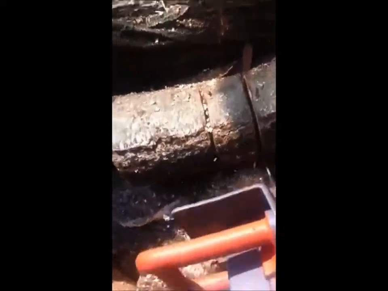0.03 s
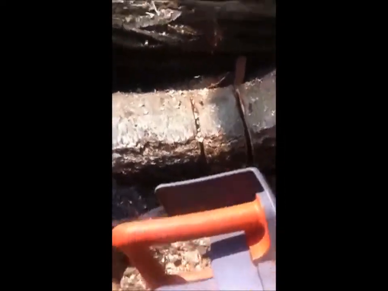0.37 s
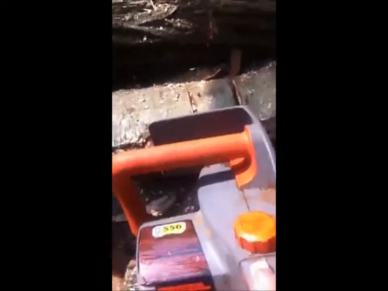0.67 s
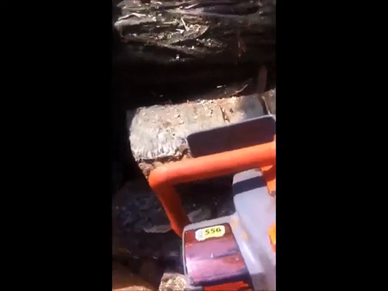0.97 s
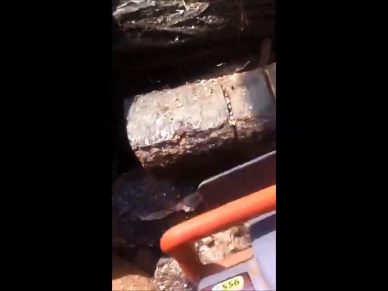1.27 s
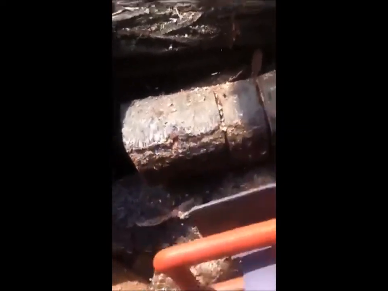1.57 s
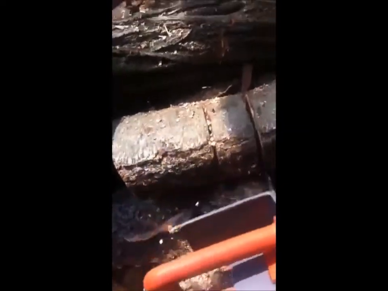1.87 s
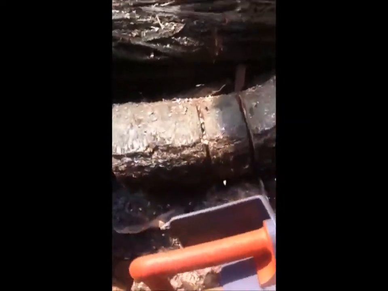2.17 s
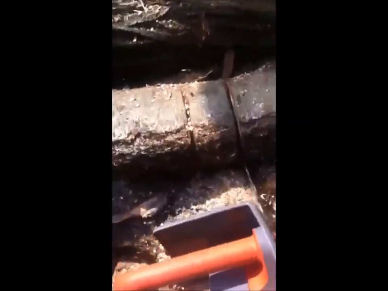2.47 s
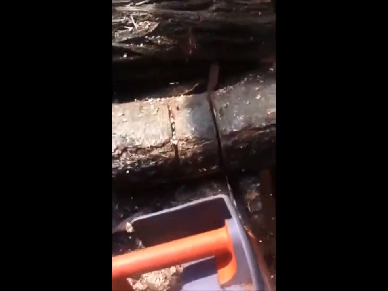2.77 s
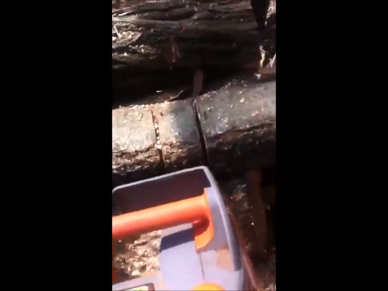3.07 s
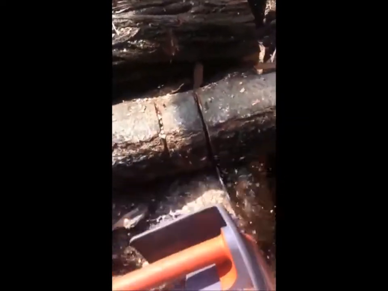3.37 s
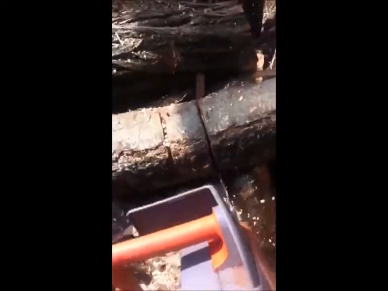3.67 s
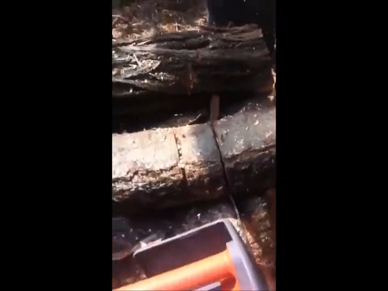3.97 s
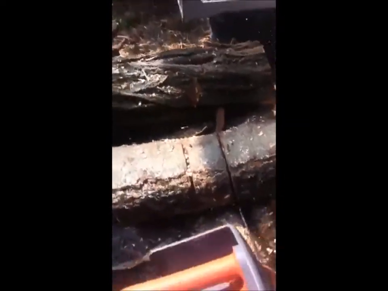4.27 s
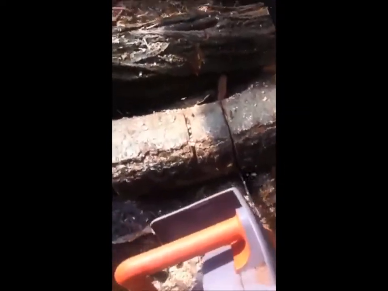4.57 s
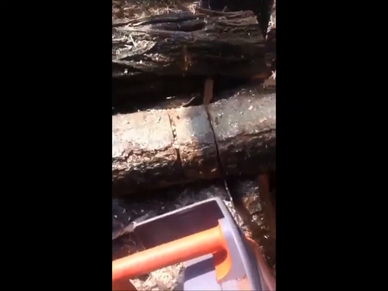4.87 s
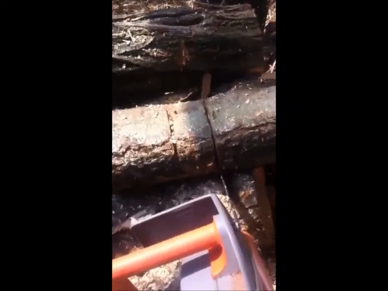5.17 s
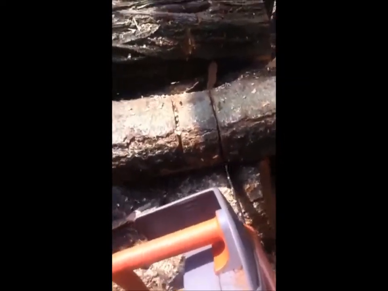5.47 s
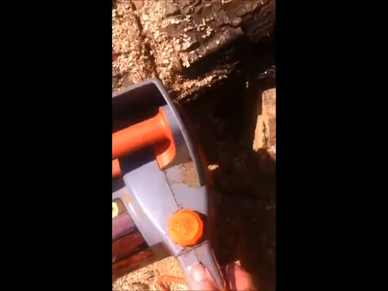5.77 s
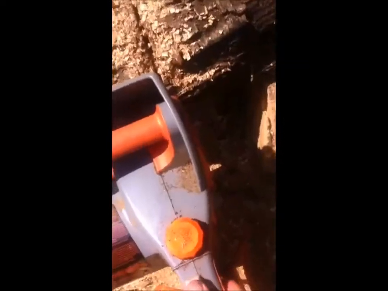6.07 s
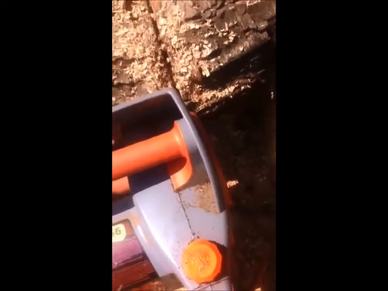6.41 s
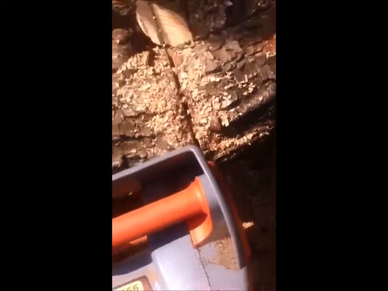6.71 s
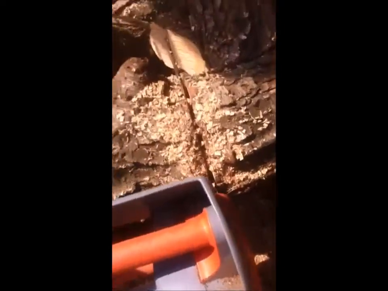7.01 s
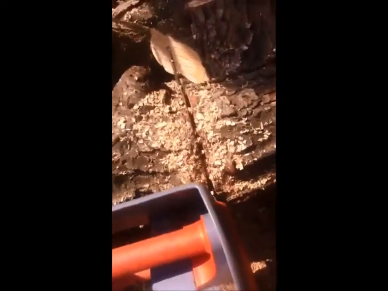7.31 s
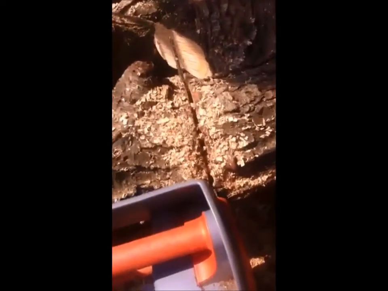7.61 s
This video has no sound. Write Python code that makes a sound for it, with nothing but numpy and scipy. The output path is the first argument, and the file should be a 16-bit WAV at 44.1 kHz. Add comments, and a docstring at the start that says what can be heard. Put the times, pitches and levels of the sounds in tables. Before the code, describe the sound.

Close by and outdoors, an electric chainsaw buzzes and rasps steadily through a log, its pitch sagging slightly under load, with brief thin shrieks from the bar. The cutting ends and the saw coasts down in a falling, rattling whine. In the quiet afterwards come light handling clicks, soft scraping on bark and barely audible bird whistles, before the saw clacks and begins spinning up again.

```python
"""Electric chainsaw cutting a log

Outdoors, the motor hums through rotor unbalance, chain links rattle the housing and teeth rasp the wood.
The trigger is let go, and friction and drag bring the whining gears to a stop. The level dips briefly;
the saw clicks and scrapes as it is shifted on the log, a far bird whistles, and the motor starts
again with a clack."""
import sys
import numpy as np
from scipy import signal
from scipy.fft import rfft, irfft
from scipy.io import wavfile

SR = 44100
rng = np.random.default_rng(int(sys.argv[2]) if len(sys.argv) > 2 else 0)


def generate_wav(sig):
    """Save sig (samples, or channels by samples) to the path in sys.argv[1] as 16-bit PCM at SR."""
    pcm = np.round(np.clip(np.atleast_2d(sig).T, -1, 1) * 32767).astype(np.int16)
    wavfile.write(sys.argv[1], SR, pcm)


N = 346185
T = np.arange(N) / SR
FULL_HZ, LINKS_PER_TURN, GEAR_ORDER = 390, 1.073, 11.8  # motor speed; links and gear teeth per turn


def amp(db):
    """Decibels to gain."""
    return 10 ** (np.asarray(db) / 20)


def unit(x):
    """Scale to rms 1."""
    return x / np.sqrt(np.mean(x ** 2))


def noise():
    """White noise."""
    return rng.standard_normal(N)


def walk(rate):
    """Random fluctuation of rms 1 that changes rate times a second."""
    return unit(np.interp(T * rate, np.arange(N), noise()))


def cycles(hz):
    """Phase in cycles, the integral of frequency."""
    return np.cumsum(hz) / SR


def swells(x, rows):
    return sum(height * np.exp(-((x - centre) / width) ** 2) for centre, width, height in rows)


def episodes(rows, x=T):
    """Gaussian swells of gain along x, with heights given in dB."""
    return swells(x, [(centre, width, amp(db)) for centre, width, db in rows])


def butter(x, order, hz, kind="low"):
    """Maximally flat filter."""
    return signal.sosfilt(signal.butter(order, hz, kind, fs=SR, output="sos"), x)


def colour(x, points):
    """Minimum-phase filter with the given (Hz, dB) shape and unit power gain."""
    hz, db = np.transpose(points)
    log_gain = np.interp(np.log(np.arange(2049) * SR / 4096 + 1), np.log(hz), np.log(amp(db)))
    cepstrum = irfft(log_gain) * np.r_[1, np.full(2047, 2), 1, np.zeros(2047)]
    response = irfft(np.exp(rfft(cepstrum)))
    return signal.fftconvolve(x, response / np.linalg.norm(response))[:N]


def ring(x, modes):
    """Forced response of parallel resonators."""
    return sum(amp(db) * signal.lfilter(*signal.iirpeak(hz, hz / width, fs=SR), x)
               for hz, width, db in modes)


def shifting(x, modes, depth_db, rate):
    """Modal excitation varies as the point of impact moves."""
    return sum(amp(depth_db * np.tanh(walk(rate))) * ring(x, [mode]) for mode in modes)


def blows(count, scatter_db, decay_cycles):
    """Impact train: one decaying noise burst per cycle."""
    strength = amp(scatter_db * noise()[count.astype(int)])
    return unit(strength * np.exp(-(count % 1) / decay_cycles) * noise())


# Hum under load. Each row: time in seconds, relative level in dB.
HUM_LEVELS = [(0.0, -17), (0.05, -23), (0.24, -14.5), (0.26, -26.5), (0.32, -18), (0.97, -27.5),
              (1.01, -38), (1.04, -25.5), (1.15, -24.5), (1.18, -18), (1.22, -36), (1.3, -16.5),
              (1.36, -22.5), (1.9, -19.5), (2.23, -22.5), (2.25, -17.5), (2.55, -20), (2.56, -22),
              (2.96, -16), (3.03, -25), (3.14, -21.5), (3.16, -28), (3.41, -16), (3.45, -29), (3.5, -19),
              (3.83, -26.5), (4.14, -23.5), (4.3, -23.5)]
# Partials of buzz and growl. Each row: multiple of the motor speed, relative level in dB.
BUZZ_PARTIALS = [(2, 1.5), (2.146, -9.5), (3, -4)]
GROWL_PARTIALS = [(.5, -12), (1.5, -4)]
# Peaks of the buzz. Each row: motor speed in Hz, half width in Hz, boost in dB.
BUZZ_SPEEDS = [(372, 14, 4.2), (282, 29, 10)]
# The motor labours; the bar chatters. Each row: centre and half length in seconds, relative level in dB.
LABOURING = [(0.038, 0.051, 8.5), (0.251, 0.11, 6), (2.39, .08, 7), (2.84, 0.1, 5), (3.663, 0.21, 6.5),
             (4.259, .06, 2)]
GROWLS = [(.35, 0.36, -31), (.93, 0.24, -26), (1.31, 0.033, -20), (2.98, 0.23, -23.5), (3.87, 0.11, -37)]


def motor(hz, halvings):
    """Rotor unbalance hums, with buzzing overtones; bar chatter adds a half-speed subharmonic growl."""
    phase = 2 * np.pi * cycles(hz * (1 + 0.0049 * walk(70)))
    hum_db = np.interp(T, *np.transpose(HUM_LEVELS)) + 1.45 - 18 * np.maximum(halvings - .1, 0)
    buzz_db = -32.5 - 9.5 * halvings + swells(hz, BUZZ_SPEEDS) + swells(T, LABOURING)
    out = amp(hum_db + 2 * walk(40)) * np.sin(phase)
    for gain, partials in ((amp(buzz_db), BUZZ_PARTIALS), (episodes(GROWLS), GROWL_PARTIALS)):
        out += gain * sum(amp(db + 5 + 1.7 * walk(30)) * np.sin(k * phase) for k, db in partials)
    return out


# Spectra of the chain. Each row: frequency in Hz, relative level in dB.
RATTLE_SPECTRUM = [(40, -41.5), (90, -48.5), (140, -25), (200, -9.5), (300, -2), (450, -0.5), (620, 4),
                   (900, 0.5), (1400, -1.5), (2000, -3), (2800, -9), (4000, -11.5), (7000, -22.5),
                   (15000, -50.5)]
RASP_SPECTRUM = [(300, -52), (1500, -8), (3000, -0.5), (3900, -1), (4400, -2), (5200, 0.5), (6200, -3),
                 (7200, -8), (9400, -9.5), (11000, -15.5), (13000, -15.5), (15700, -23.5)]
# Resonances that it excites. Each row: frequency in Hz, bandwidth in Hz, gain in dB.
HOUSING_MODES = [(311.3, 25, -4), (530, 26, -21), (892, 29, -11), (1109, 34, 3), (1168, 23, 2),
                 (1450, 100, -14), (1895, 14, -1)]
BAR_MODES = [(2515, 38, -1.5), (3570, 100, -1), (4270, 54, -2), (4770, 70, -8.5), (5880, 120, -6)]
SLACK_MODES = [(302, 57, -4.5), (537, 67, 12), (1102, 500, 0.5), (1560, 99, 3.5), (1887, 60, 0.5),
               (2280, 70, 2.5), (3440, 50, 9), (4730, 90, -15.5), (7600, 360, -6.5)]


def chain(hz, load, throb, rattle_db, rasp_db):
    """Impact excitation: links strike the sprocket, and a tooth on every second link tears the wood."""
    links = cycles(LINKS_PER_TURN * hz * (1 + .04 * walk(300)))
    knocks = unit(blows(links, scatter_db=0.5, decay_cycles=0.51) + 1.53 * noise())
    knocks *= throb * amp(0.61 * walk(90))
    # the chain jumps in its groove roughly 65 times a second
    jumps = blows(cycles(65 * amp(4 * walk(80))), scatter_db=1.5, decay_cycles=0.29)
    strikes = knocks + amp(-6.5) * load * jumps
    housing = shifting(strikes, HOUSING_MODES, depth_db=1.5, rate=18)
    body = unit(colour(strikes + 1.1 * housing, RATTLE_SPECTRUM))
    # a broad crunch grows as the load pulls the motor below full speed
    body += 4 * load * (1 - hz / FULL_HZ) * ring(body, [(2000, 1300, 0)])
    # out of the cut the chain runs slack; slow links strike softly and ring duller
    slack = shifting(knocks, SLACK_MODES, depth_db=3.5, rate=16)
    slack = unit(butter(slack, 3, [200, 7000], "band"))
    force = np.clip(hz / 140, 0, 1)
    slack = force * slack + (1 - force) * amp(-1) * butter(slack, 1, 700)
    rattle = load * body + (1 - load) * (amp(-3) * body + amp(-4) * slack)
    teeth = unit(blows(links / 2, scatter_db=0, decay_cycles=1) + 1.6 * noise())
    teeth *= throb * amp(.5 * walk(60))
    rasp = unit(colour(teeth + ring(teeth, BAR_MODES), RASP_SPECTRUM))
    return amp(rattle_db) * rattle + amp(rasp_db) * rasp


# Gearbox resonances. Each row: frequency in Hz, bandwidth in Hz, gain in dB.
GEARBOX_MODES = [(890, 60, -1), (1060, 110, -2), (1450, 60, 1.5), (1608, 60, 8.5), (1760, 50, 1.5),
                 (1976, 60, 6.5), (2250, 58, 8), (2480, 60, 0), (3500, 40, 12.5), (4250, 30, -3.5),
                 (4650, 140, -1), (5230, 210, -1.5), (5674, 510, -4.5)]
# The taut chain makes the gears sing. Each row: centre and half length in seconds, boost in dB.
SINGING = [(0.359, .12, 4.5), (0.818, .13, 5.5), (1.17, .08, 4.5), (1.88, .11, 4.5), (2.5, .13, 3),
           (3.31, .08, 8.5), (3.717, .05, 3), (4.03, .08, 3)]
# Gear teeth slap. Each row: motor speed in Hz, half width in Hz, relative level in dB.
SLAPS = [(245.4, 35, -9.5), (177.5, 42, -9), (88, 18, -6)]


def gears(hz, load, throb, whine_db, rattle_db):
    """Teeth whine at the mesh frequency; unloaded, they chatter in their backlash and roughen the tone."""
    loose = 1 - load
    flutter = .0035 * walk(60) + (.0095 + .032 * loose) * walk(900)
    mesh = 2 * np.pi * cycles(GEAR_ORDER * hz * (1 + flutter))
    link = 2 * np.pi * cycles(LINKS_PER_TURN * hz)
    fits = throb * amp(3.5 * loose * np.tanh(walk(110)))
    chatter = unit(amp((3 + 2.2 * loose) * np.tanh(walk(350)))) * fits
    # the tug of each link modulates the mesh tone, giving two sidebands
    lower = np.sin(mesh - link) * amp(5 + swells(T, SINGING) + 2.5 * walk(22))
    upper = np.sin(mesh + link) * amp(2 + 2.7 * walk(22))
    carrier = np.sin(mesh) * amp(load * (3.3 * walk(14) + 0.5))
    tone = chatter * (carrier + (0.25 + 0.46 * load) * (lower + upper))
    # grinding spreads the tone into a band of noise
    grind = amp(-3.5) * loose * fits * (walk(900) * np.sin(mesh) + walk(900) * np.cos(mesh))
    whine = (0.93 + 0.17 * load) * tone + 0.43 * grind + 1.2 * ring(tone + grind, GEARBOX_MODES)
    # slapping adds an octave, heard where it meets a resonance
    slap = chatter * (np.sin(2 * mesh) + 0.34 * np.sin(2 * mesh + link))
    slap_gain = amp(rattle_db + 3) * loose * episodes(SLAPS, hz)
    return amp(whine_db) * whine + slap_gain * ring(slap, GEARBOX_MODES)


# Feed of the teeth into the log. Each row: time in seconds, relative level of the rasp in dB.
FEED_LEVELS = [(0.0, -17), (0.08, -17), (0.17, -15), (0.2, -18.5), (0.39, -17), (0.43, -19), (0.53, -17),
               (0.62, -21.5), (0.86, -16), (1.08, -19.5), (1.28, -14.5), (1.38, -19), (1.99, -15),
               (2.02, -18.5), (2.71, -16.5), (2.85, -19), (2.95, -16.5), (3.14, -18.5), (3.22, -17),
               (3.9, -17.5), (4.08, -16), (4.27, -17.5)]
# Critical speeds of the unloaded gears. Each row: motor speed in Hz, half width in Hz, boost in dB.
SQUEAL_SPEEDS = [(301, 14, 11), (199, 13, 6.5), (153, 28, 8.5), (88.5, 19, 2.8)]
# The slack chain lashes the bar. Each row: time in seconds, boost in dB.
CHAIN_LASHES = [(4.853, 5.5), (4.937, 5), (5.224, 2.5), (5.266, 3.5), (5.303, 2), (5.358, 5), (5.385, 5),
                (5.46, 5.5), (5.52, 3.5), (7.842, 2)]
NORMAL_FEED_DB, LASH_HALF_S, SPROCKET_TEETH = -17.5, 0.0065, 6


def saw(hz, load, running, strain_rattle_db=0, strain_whine_db=0):
    """Rotating machine noise: motor speed, load (0-1) and feed govern motor, gears and chain together."""
    halvings = np.log2(FULL_HZ / hz)
    feed_db = load * (np.interp(T, *np.transpose(FEED_LEVELS)) - NORMAL_FEED_DB)
    rasp_db = -19 + feed_db - 6.5 * halvings
    rattle_db = -15.5 + 0.69 * feed_db - 2.5 * halvings + strain_rattle_db
    unloaded_db = -29.5 + swells(hz, SQUEAL_SPEEDS) + strain_whine_db
    whine_db = -32 * load + 0.8 * feed_db + (1 - load) * unloaded_db
    # the chain whips once per turn of the sprocket
    whip = np.sin(2 * np.pi * cycles(LINKS_PER_TURN * hz / SPROCKET_TEETH))
    lash_db = swells(T, [(s, LASH_HALF_S, db) for s, db in CHAIN_LASHES])
    throb = amp((0.5 - load) * (0.67 * whip + 1.4 * walk(70)) + lash_db)
    drive = motor(hz, halvings) + drone(hz) + gears(hz, load, throb, whine_db, rattle_db)
    radiated = butter(drive * running, 5, 185, "high")  # a small housing radiates little bass
    return radiated + running * chain(hz, load, throb, rattle_db + surge_db(), rasp_db)


# The motor during the cut. Each row: time in seconds, speed in Hz.
CUTTING_SPEED = [(0.0, 391.8), (0.19, 372.5), (0.6, 401.2), (0.92, 416.3), (1.4, 407), (1.67, 396.5),
                 (1.92, 395.2), (2.12, 391.4), (2.38, 394.6), (2.77, 384.8), (3.13, 403.5), (3.4, 392.3),
                 (3.62, 369), (3.76, 367), (3.97, 376.3), (4.27, 370)]
RELEASE_S, STALL_S, STALL_FADE_S = 4.288, 5.628, 0.084
FRICTION_HZ_PER_S, DRAG_S = 152, 1.7


def cut_and_coast():
    """The saw cuts until the trigger is let go; dry friction and air drag then slow it to a stall."""
    coasting = np.maximum(T - RELEASE_S, 0)
    drag = np.exp(-coasting / DRAG_S)
    hz = np.interp(T, *np.transpose(CUTTING_SPEED)) * drag - FRICTION_HZ_PER_S * DRAG_S * (1 - drag)
    load = np.clip(1 - coasting / .23, 0, 1)
    running = np.clip(1 - (T - STALL_S) / STALL_FADE_S, 0, 1) ** 3.6
    return saw(np.maximum(hz, 1), load, running)


# Outdoor background. Each row: frequency in Hz, relative level in dB.
AIR_SPECTRUM = [(15, -65.5), (25, -43), (69, -25.5), (136, -6.5), (227, -11), (399, -13), (495, -18),
                (1200, -20.5), (1300, -24), (2360, -25.5), (2850, -31), (3170, -28), (15500, -40.5)]
DIP_START_S, DIP_END_S = 5.787, 5.865


def air():
    """Broadband ambient noise wavers, a little louder before the dip in level."""
    return colour(noise(), AIR_SPECTRUM) * amp(-56.5 + .7 * walk(32) + 2.6 * (T < DIP_START_S))


# The chain binds in the kerf. Each row: centre and half length in seconds, level in dB.
BINDING = [(.15, .035, -23.5), (.9, 0.1, -24), (1.28, 0.038, -22), (1.84, 0.061, -22), (3.43, .07, -22.5)]
# Resonances of the pinched bar. Each row: frequency in Hz, bandwidth in Hz, gain per pass in dB.
PINCHED_MODES = [(4760, 170, 0.5), (5050, 190, 4), (5310, 120, -4)]


def shriek():
    """Forced vibration: the pinched bar rings roughly under the passing teeth."""
    teeth = noise() * amp(2.5 * walk(200))
    return unit(ring(ring(teeth, PINCHED_MODES), PINCHED_MODES)) * episodes(BINDING)


# Brief accents. Each row: time in seconds, boost of the rattle in dB, thump level in dB.
ACCENTS = [(.228, 4, -55), (.355, 3, -61), (.402, 3.5, -55.5), (.575, 3, -50.5), (.69, 1.5, -60.5),
           (.965, 3, -66), (1.27, 0.5, -60.5), (1.325, 1.5, -51), (1.51, 1.5, -62.5), (1.625, 2.5, -62),
           (1.695, 3, -61.5), (1.775, 2, -61.5), (1.93, 0, -61), (1.98, 1.8, -62), (2.249, 3, -45.5),
           (2.46, 1, -60.5), (2.725, 0, -47), (2.99, 0.5, -48), (3.234, 3.5, -64), (3.504, 1, -54),
           (3.6, 1.5, -66), (3.73, 1.5, -45.5), (4.12, 2, -58), (4.85, -1.5, -56.5)]


def thumps(t60=0.21):
    """Damped sinusoids: faint, short low thumps, mostly at the loud peaks of the cut."""
    out = np.zeros(N)
    for start, _, db in ACCENTS:
        age = np.maximum(T - start, 0)
        hz = rng.uniform(55.8, 96)
        out += amp(db - 60 * age / t60) * (1 - np.exp(-age / .004)) * np.sin(2 * np.pi * hz * age)
    return out


def surge_db(half_s=0.022):
    """Brief amplitude modulation of the rattle as the teeth catch."""
    return swells(T, [(s, half_s, db) for s, db, _ in ACCENTS])


def drone(hz, motor_hz=69, half_width_hz=20, db=-26.5):
    """At low motor speed the chain excites its lowest resonance."""
    lowest = SLACK_MODES[:1]
    return unit(ring(ring(noise(), lowest), lowest)) * episodes([(motor_hz, half_width_hz, db)], hz)


# Spectrum of contact noise. Each row: frequency in Hz, relative level in dB.
CONTACT_SPECTRUM = [(88, -54), (150, -5), (393, -2), (742, -3.5), (1030, 1), (1670, -7), (1910, -10),
                    (2310, -9), (4540, -12.5), (6940, -18), (10800, -35), (15000, -44)]
# Resonances of the struck saw and log. Each row: frequency in Hz, bandwidth in Hz, gain in dB.
STRUCK_MODES = [(320, 31, 3), (505, 83, -2), (1010, 170, 2), (1430, 110, 2), (2290, 95, -2),
                (3240, 130, -2), (4430, 120, -9)]
# The chain clunks to rest; a dull bump as the sound returns after the dip; then handling clicks.
# Each row: start in seconds, relative level in dB, 60 dB decay time in seconds, treble gain in dB.
SMALL_KNOCKS = [(5.648, -25, .13, -10), (5.869, -43.5, 0.053, -16), (6.054, -42, 0.058, -6),
                (6.880, -39.5, 0.033, 7), (7.077, -39.5, 0.038, 9.5), (7.149, -37, 0.045, -13),
                (7.204, -37, .04, -15), (7.213, -34.5, 0.05, -18), (7.259, -43, 0.056, -5),
                (7.558, -41, 0.065, -10), (7.605, -35, 0.054, -13), (7.623, -45, .04, -8),
                (7.64, -33, 0.055, -5), (7.661, -38, 0.05, -11), (7.747, -34, 0.031, 5)]


def clacks(events, gain_db):
    """Impacts excite the modes of the plastic body and the log; harder contact carries more treble."""
    low, high = np.zeros(N), np.zeros(N)
    for start, db, t60, treble_db in events:
        age = np.maximum(T - start, 0)
        fade = (T >= start) * amp(db - 60 * age / t60)
        low += fade
        high += fade * amp(treble_db)
    grit = noise()
    dull = butter(grit, 1, 850)
    blow = colour(low * dull + high * (grit - dull), CONTACT_SPECTRUM)
    return amp(gain_db) * (blow + shifting(blow, STRUCK_MODES, depth_db=3.5, rate=20))


# The bar moves on the log. Each row: centre and half length in seconds, level in dB.
BARK_SCRAPES = [(5.99, 0.16, -61), (7.12, 0.084, -56), (7.27, 0.044, -54.5), (7.64, 0.046, -59)]
STEEL_SLIDES = [(5.99, 0.082, -73), (7.12, .035, -67), (7.19, .03, -67), (7.265, 0.037, -69)]
STEEL_SQUEAKS = [(7.34, 0.015, -61)]
# Resonances of the sliding steel. Each row: frequency in Hz, bandwidth in Hz, gain in dB.
SLIDE_MODES = [(3900, 600, 6), (5170, 900, -2), (6430, 600, -11.5)]
SQUEAK_MODES = [(3480, 450, 0)]


def scrape():
    """Sliding friction crumbles the bark and makes the steel bar hiss and squeak."""
    grains = unit(noise() * amp(5 * np.tanh(walk(410))))
    hiss = unit(ring(grains * amp(2.8 * walk(70)), SLIDE_MODES))
    squeak = unit(ring(ring(grains, SQUEAK_MODES), SQUEAK_MODES))
    bark = colour(grains * episodes(BARK_SCRAPES), CONTACT_SPECTRUM)
    return bark + hiss * episodes(STEEL_SLIDES) + squeak * episodes(STEEL_SQUEAKS)


# A far bird. Each row: start and length in seconds, first and last pitch in Hz, level in dB.
BIRD_WHISTLES = [(6.07, 0.22, 8300, 8150, -70), (6.05, 0.24, 7050, 6800, -71.5),
                 (6.69, .13, 2800, 2780, -65), (7.33, 0.22, 8000, 8050, -67.5),
                 (7.31, .25, 7150, 6800, -68)]


def bird():
    """Thin gliding whistles, made slightly buzzy by random frequency modulation."""
    out = np.zeros(N)
    for start, length, start_hz, end_hz, db in BIRD_WHISTLES:
        progress = np.clip((T - start) / length, 0, 1)
        hz = (start_hz + (end_hz - start_hz) * progress) * (1 + .021 * walk(700))
        out += amp(db + 2.5 * walk(90)) * np.sin(np.pi * progress) * np.sin(2 * np.pi * cycles(hz))
    return out


RESTART_S, SPIN_UP_HZ_PER_S, STRAIN_DECAY_S = 7.772, 2150, 0.047


def restart():
    """Uniform acceleration clear of the wood; the starting torque briefly strains chain and gears."""
    age = np.maximum(T - RESTART_S, 0)
    hz = np.maximum(SPIN_UP_HZ_PER_S * age, 1)
    running = np.clip(age / 0.0064, 0, 1)
    strain = np.exp(-age / STRAIN_DECAY_S)
    return saw(hz, np.zeros(N), running, strain_rattle_db=8 * strain, strain_whine_db=16.5 * strain)


# Gear impacts at the restart.
# Each row: start in seconds, relative level in dB, 60 dB decay time in seconds, treble gain in dB.
GEAR_IMPACTS = [(7.773, -9, 0.031, 18.5), (7.789, -2, .04, -14), (7.805, -6, .03, -6), (7.82, -5, .03, -5)]


def kick():
    """Backlash closes with a clack as the gears take up their slack."""
    return clacks(GEAR_IMPACTS, gain_db=-13)


def scene():
    """Superposition of saw, handling and surroundings; the whole dips briefly after the stall."""
    machine = cut_and_coast() + restart() + thumps() + shriek() + kick()
    quiet = clacks(SMALL_KNOCKS, gain_db=-6) + scrape() + bird() + air()
    dip = np.where((T >= DIP_START_S) & (T <= DIP_END_S), amp(-29), 1)
    return ((machine + quiet) * dip)[None]


def record(dry):
    """Soft saturation rounds the highest peaks, and a steep low-pass cuts the top."""
    rounded = dry / (1 + dry ** 12) ** (1 / 12)
    return signal.sosfilt(signal.ellip(10, .2, 80, 15800, fs=SR, output="sos"), rounded)


dry = scene()
out = record(dry)
generate_wav(out)
```